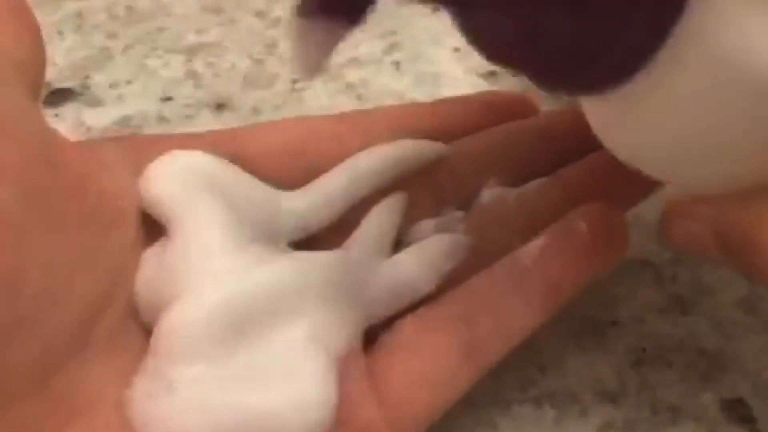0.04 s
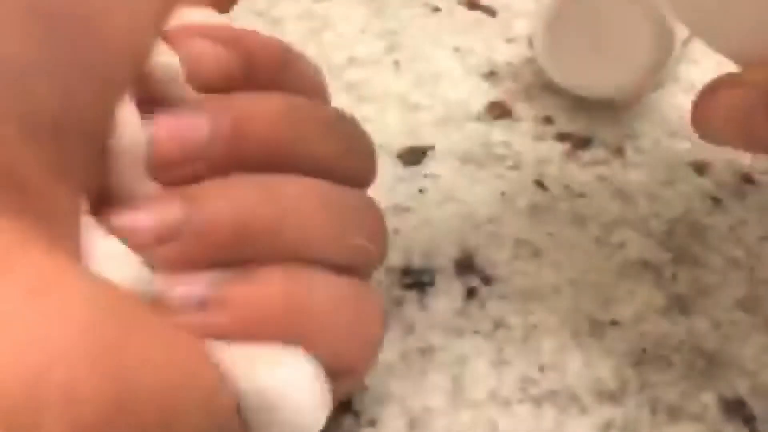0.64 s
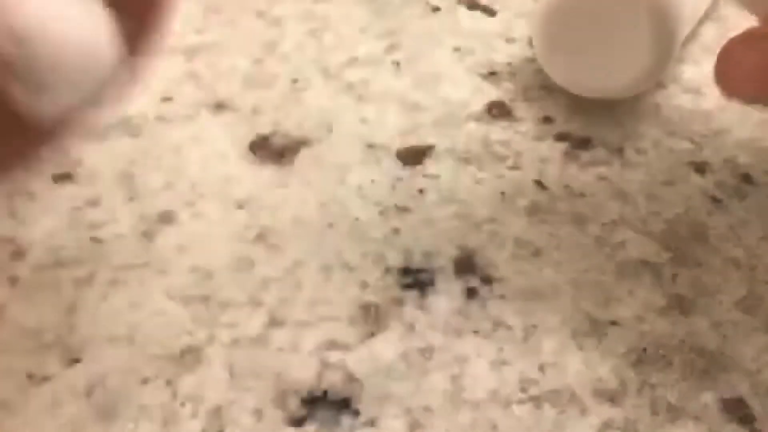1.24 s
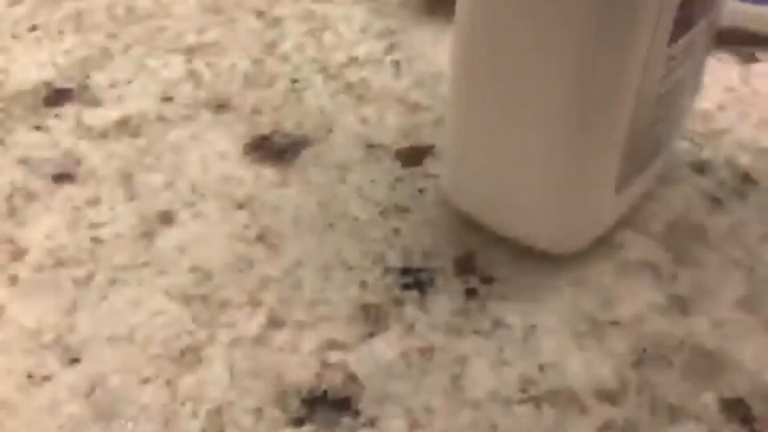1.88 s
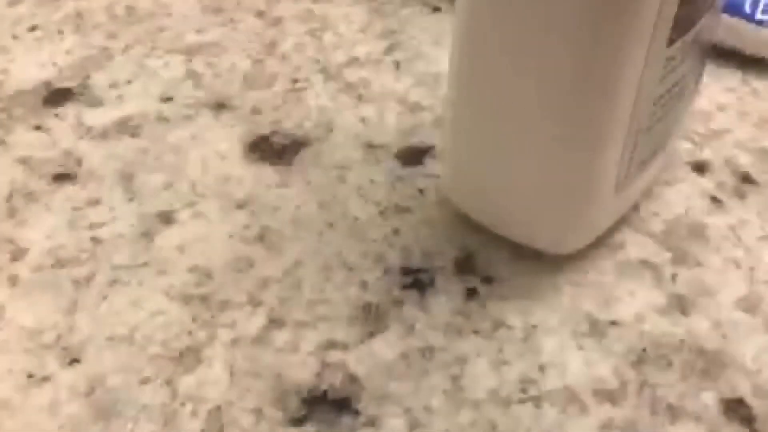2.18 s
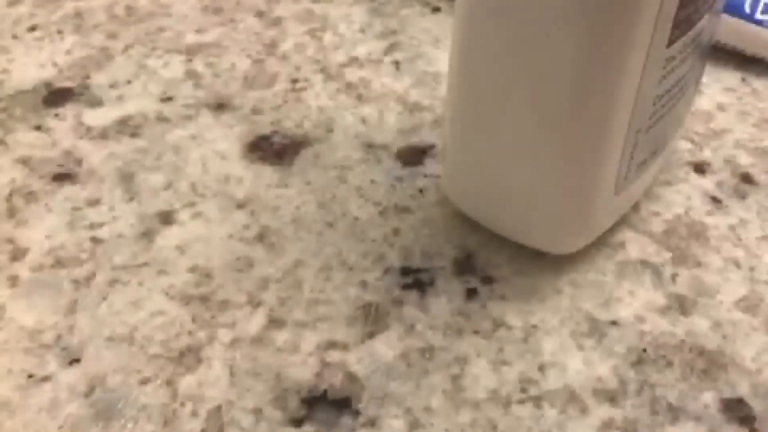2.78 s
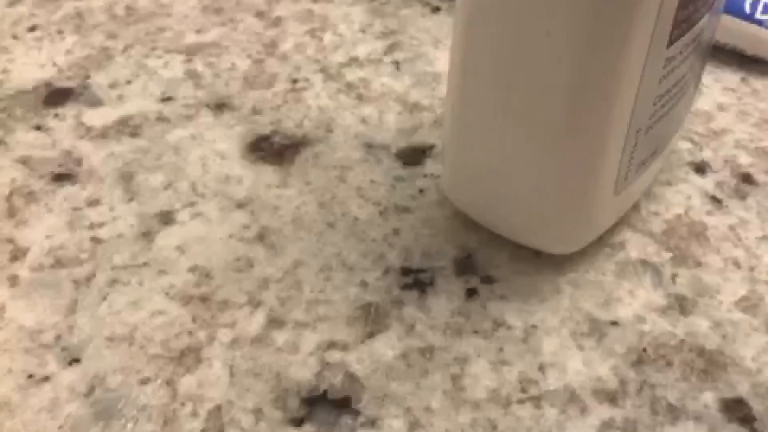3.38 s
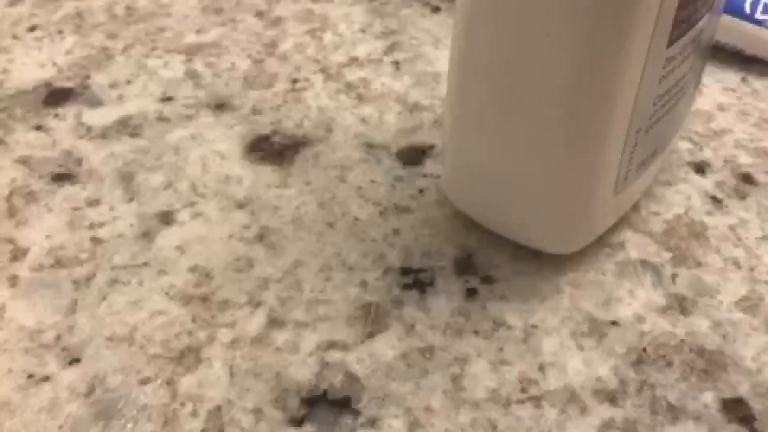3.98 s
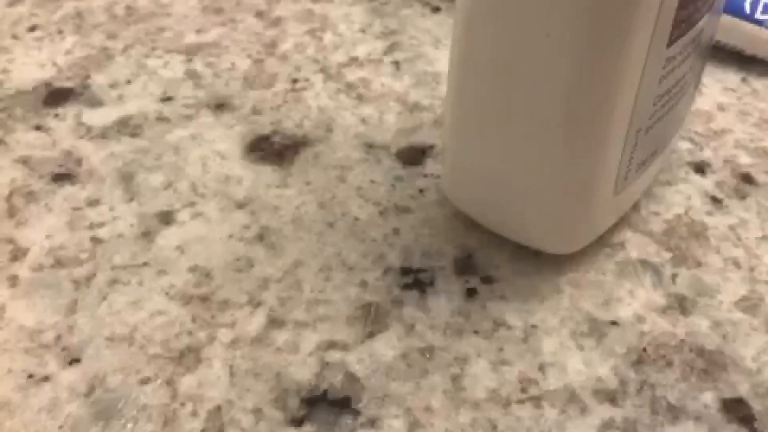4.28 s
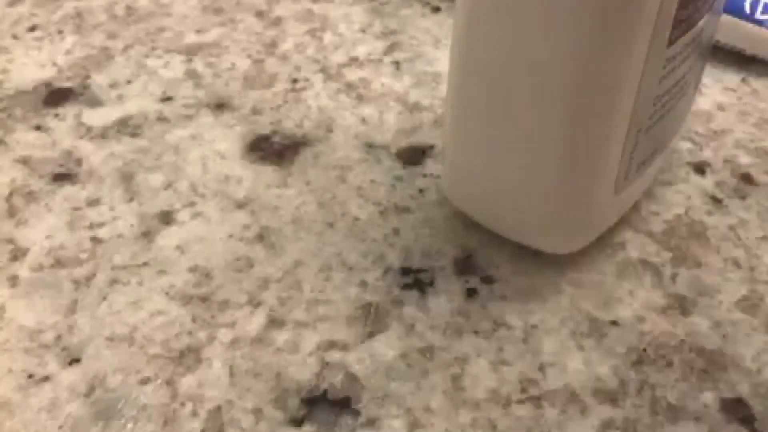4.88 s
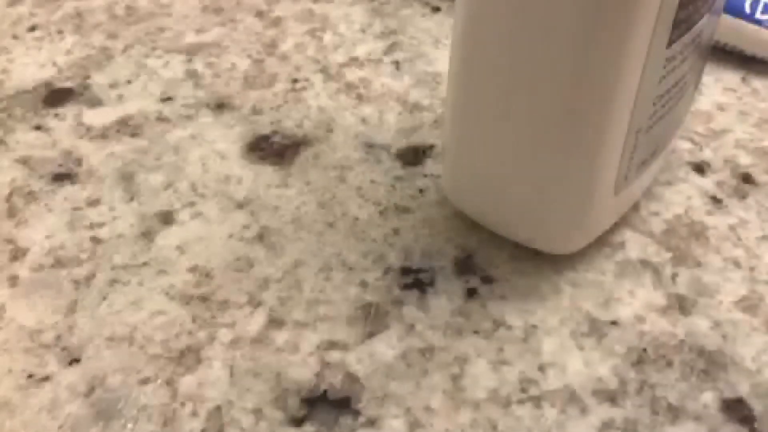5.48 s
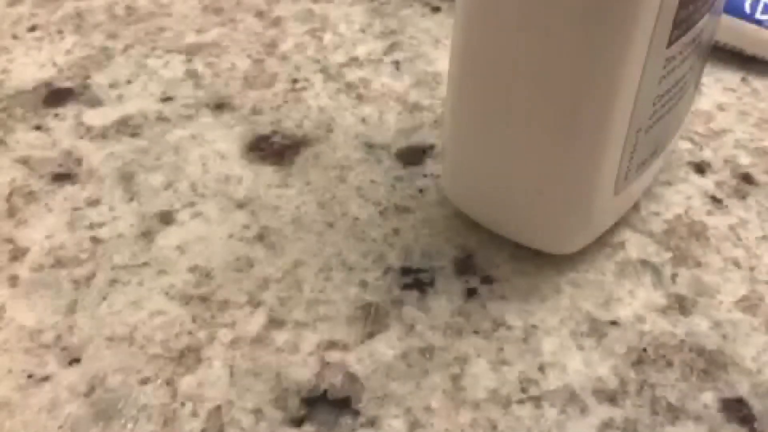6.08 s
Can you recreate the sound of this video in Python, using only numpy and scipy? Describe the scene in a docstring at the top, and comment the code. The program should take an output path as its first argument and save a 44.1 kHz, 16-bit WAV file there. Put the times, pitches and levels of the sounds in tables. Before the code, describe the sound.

Close up, hands rub and bump a hollow plastic bottle while its pump pushes out foam in four soft, fizzy spurts. A short wet squelch follows the first; after each of the others the pump draws in air and clicks back. A faint hum comes and goes, then the bottle lands on a stone counter with a hollow knock, ringing briefly in a small bathroom.

```python
"""In a small, hard-walled bathroom a soap pump is pressed, fizzing through its foam mesh, and a fist
squeezes the wet foam. Three more presses follow; after each, the spring sucks in air and the piston
clicks against its stop. Hands rustle and bump throughout, and the sound drops out briefly after the
second and fourth presses. Then a faint hum comes and goes, and at the end the bottle is set down on
the stone counter with a hollow knock."""
import sys
import numpy as np
from scipy import signal
from scipy.fft import rfft, irfft, next_fast_len
from scipy.io import wavfile
from scipy.ndimage import uniform_filter1d

SR = 44100
rng = np.random.default_rng(int(sys.argv[2]) if len(sys.argv) > 2 else 0)


def to_wav(sig):
    """Store sig (one row per channel, or 1-D mono) as 16-bit WAV at the path in sys.argv[1].

    Samples outside -1..1 are clipped; the rate is SR.
    """
    pcm = np.clip(np.atleast_2d(sig), -1, 1) * 32767
    pcm = np.round(pcm).astype(np.int16)
    wavfile.write(sys.argv[1], SR, pcm.T)  # frames by channels


N = 270753
TIME = np.arange(N) / SR


def amp(db):
    """Turn decibels into a gain. Table levels are relative: later gains and filters shift them."""
    return 10 ** (np.asarray(db) / 20)


def rms_one(x):
    """Scale a signal so that its average strength (rms) is 1."""
    return x / np.sqrt(np.mean(x ** 2) + 1e-20)


def at_hz(points, hz, column=1):
    """Read between the rows of a table, on a logarithmic frequency scale."""
    points = np.array(points)
    return np.interp(np.log(np.maximum(hz, 1)), np.log(points[:, 0]), points[:, column])


def cut(x, hz, kind, order=2):
    """Filter a sound, keeping its "low" part, its "high" part or a "band"."""
    sections = signal.butter(order, np.clip(hz, 10, .45 * SR), kind, fs=SR, output="sos")
    return signal.sosfilt(sections, x)


def coloured(x, spectrum):
    """Give a steady signal a tone colour; rms 1."""
    size = next_fast_len(len(x))
    gains = amp(at_hz(spectrum, np.fft.rfftfreq(size, 1 / SR)))
    return rms_one(irfft(rfft(x, size) * gains, size)[:len(x)])


def resonances(x, peaks):
    """Make a signal ring at several pitches, added with alternating signs; rms 1."""
    out = 0
    for k, (hz, width, db) in enumerate(peaks):
        r = np.exp(-np.pi * width / SR)
        ringing = signal.lfilter([1, 0, -1], [1, -2 * r * np.cos(2 * np.pi * hz / SR), r * r], x)
        out = out + (-1) ** k * amp(db) * (1 - r * r) * ringing
    return rms_one(out)


def decay(t, t60):
    """A fade that falls by 60 dB in the ring time t60."""
    return np.exp(-np.log(1000) * t / t60)


def ring(hz, t60):
    """Half a second of one struck tone."""
    t = TIME[:SR // 2]
    return np.sin(2 * np.pi * hz * t) * decay(t, t60)


def add(track, s, sound):
    """Mix a sound into a track, s seconds in."""
    at = max(round(s * SR), 0)
    track[at:at + len(sound)] += sound[:N - at]


def stroke(start, end, db, attack_s, release_s, swell_db=0):
    """Gain of one gesture: it fades in, changes by swell_db to reach db at its end, then dies away."""
    progress = np.clip((TIME - start) / (end - start), 0, 1)
    fade_in = np.clip((TIME - start) / attack_s, 0, 1)
    fade_out = np.exp(-np.clip((TIME - end) / release_s, 0, 20))
    return amp(db + swell_db * (progress - 1)) * fade_in * fade_out


def sputter(depth_db, rate_hz):
    """Quick random spurts of a wet flow or a sticky slide, as a gain."""
    return amp(depth_db * rms_one(cut(rng.standard_normal(N), rate_hz, "low")))


def grains(per_s, spread_db, air):
    """Random tiny bursts of uneven size over smooth air noise."""
    sizes = amp(spread_db * np.minimum(rng.exponential(1, N), 4)) * rng.choice([-1, 1], N)
    bursts = sizes * (rng.random(N) < per_s / SR)
    return rms_one(bursts) + air * rng.standard_normal(N)


def bubble(hz, cycles, rise=0.135):
    """A small air pocket rings and rises in pitch as it dies."""
    age = np.arange(int(cycles / hz * SR) + 2) * hz / SR / cycles  # runs from 0 to 1
    tone = np.sin(2 * np.pi * cycles * age * (1 + rise * age))
    return tone * decay(age, 1) * np.minimum(age / 0.033, 1)


def swarm(low_hz, high_hz, cycles, spread_db, count):
    """Bubbles of mixed pitch and size at random moments; rms 1."""
    out = np.zeros(N)
    for when, pitch, size in rng.random((count, 3)):
        hz = low_hz * (high_hz / low_hz) ** pitch
        add(out, when * N / SR, amp(spread_db * size ** 2) * bubble(hz, cycles))
    return rms_one(out)


# The tone colour of the still room. Each row: frequency in Hz, level in dB.
ROOM_COLOUR = [(18, -50), (30, -12), (93, 1.5), (245, -5), (345, 0.5), (473, -9.5), (666, -3), (844, -15),
               (1320, -20.5), (1910, -18.5), (4190, -23), (9220, -31), (14000, -38), (16000, -42.5)]
def still_room(db=-68.5):
    """A soft, low, steady noise lies behind everything."""
    return amp(db) * coloured(rng.standard_normal(N), ROOM_COLOUR)


def faint_hum(hz=366, width_hz=4):
    """A wavering hum in the room, made of a narrow band of noise, comes and goes."""
    swell = stroke(start=4.17, end=4.8, db=-73, attack_s=0.33, release_s=0.33)
    return swell * resonances(rng.standard_normal(N), [(hz, width_hz, 0)])


# The echo of the walls. Each row: frequency in Hz, ring time in seconds, level in dB.
WALL_ECHO = [(97.7, 0.37, -11), (261, 0.65, -7.5), (590, 0.22, -6), (1250, 0.39, -5.5), (4000, 0.17, -9),
             (7950, 0.16, -12), (15000, 0.11, -14.5)]
def bathroom(x, first_echo_s=.004, build_s=0.0031):
    """Close walls throw back a dense echo that dies faster in the treble."""
    t, tail = TIME[:SR * 3 // 4], 0
    edges_hz = np.geomspace(50, 18000, 15)
    white = rng.standard_normal((2, len(t)))
    build_up = np.clip((t - first_echo_s) / build_s, 0, 1)
    for k, band in enumerate(zip(edges_hz, edges_hz[1:])):
        hz = np.sqrt(band[0] * band[1])
        fade = decay(t, at_hz(WALL_ECHO, hz)) * build_up
        gain = amp(at_hz(WALL_ECHO, hz, column=2)) / np.linalg.norm(fade)
        tail = tail + gain * cut(white[k % 2], band, "band") * fade
    return signal.fftconvolve(x, tail)[:N]


# Echoes from the bottle, palm and counter. Each row: delay in seconds, level in dB.
CLOSE_ECHOES = [(.00093, -18), (.00152, -29.5), (.00242, -21.5), (.0056, -29)]
def near_surfaces(x):
    """Very quick echoes colour the sound above the bottle's lowest ring."""
    out, bright = x.copy(), cut(x, 420, "high")
    for delay_s, db in CLOSE_ECHOES:
        add(out, delay_s, amp(db) * bright)
    return out


# Tone colours of skin on plastic, the bottle's hollow murmur and the dull rumble of handling.
# Each row: frequency in Hz, level in dB.
SKIN_COLOUR = [(530, -15.5), (900, 1), (1310, -9), (1720, -7), (4680, 0), (5350, -4.5), (6330, 0),
               (15100, -5), (16000, -28)]
MURMUR_COLOUR = [(300, -28), (450, 1.5), (550, 3.5), (700, 5), (850, -12), (1200, -16), (2000, -18.5),
                 (4000, -23), (7000, -37.5)]
RUMBLE_COLOUR = [(25, -33.5), (55, -26), (130, 5), (220, -3.5), (340, -1.5), (450, -10), (800, -42)]
# Hand movements. Each row: start and end in seconds, then rub, murmur and rumble levels in dB.
HAND_MOVES = [(0.251, 0.413, -68, -60, -58.5), (0.595, 0.848, -87, -57, -65.5),
              (0.98, 1.345, -95, -66.5, -59.5), (1.6, 1.73, -93, -62.5, -63.5),
              (2.76, 3.107, -101, -70.5, -67), (3.156, 3.406, -107, -75, -67.5),
              (4.416, 4.491, -70, -65, -61.5), (4.516, 4.715, -68, -75, -71), (4.775, 5.247, -80, -86, -87),
              (5.319, 5.364, -74.5, -71.5, -92), (5.537, 5.665, -73, -55, -59.5)]
def hands():
    """Skin rustles on the plastic; the held bottle murmurs and rumbles with every movement and press."""
    sliding = flexing = shifting = 0
    for start, end, rub_db, murmur_db, rumble_db in HAND_MOVES:
        move = stroke(start, end, db=0, attack_s=.035, release_s=0.043, swell_db=4.5)
        sliding += amp(rub_db) * move
        flexing += amp(murmur_db) * move
        shifting += amp(rumble_db) * move
    pushing = sum(press(start, end, db) for start, end, _, db in PUMP_PRESSES)
    skin = coloured(grains(per_s=690, spread_db=11, air=1.9), SKIN_COLOUR)
    rub = skin * sliding * sputter(depth_db=2, rate_hz=45)
    murmur = coloured(grains(per_s=340, spread_db=2.5, air=0.91), MURMUR_COLOUR) * (flexing + pushing)
    rumble = coloured(rng.standard_normal(N), RUMBLE_COLOUR) * (shifting + amp(-6) * pushing)
    return amp(-0.5) * rub + amp(-3.5) * murmur + amp(-2) * rumble


# Hands and bottle bump. Each row: start in seconds, level in dB, pitch in Hz, ring time in seconds.
SOFT_BUMPS = [(0.1447, -29.5, 395, 0.021), (.373, -39, 235, 0.025), (0.4, -38.5, 118, 0.033),
              (0.652, -46, 180, 0.06), (.974, -22, 268, 0.02), (.979, -31, 151, 0.079),
              (4.418, -49.5, 126, 0.068), (4.493, -54.5, 197, 0.045), (5.731, -27, 250.3, 0.34),
              (5.877, -37, 166, 0.25)]
def bumps():
    """A padded touch rings briefly at one low pitch; a filter rounds off its start."""
    out = np.zeros(N)
    for s, db, hz, t60 in SOFT_BUMPS:
        add(out, s, amp(db) * cut(ring(hz, t60), [0.55 * hz, 5.6 * hz], "band"))
    return out


# The tones of the counter with its cabinet, and of the bottle's hard rim.
# Each row: pitch in Hz, level in dB, ring time in seconds.
COUNTER_TONES = [(127, -35, 0.46), (155, -38.5, .3), (206, -33.5, 0.26), (258.5, -19.5, 0.088),
                 (350, -28.5, 0.067), (371, -34, 0.13), (421, -45, 0.74), (533, -23.5, 0.14),
                 (561, -20.5, 0.046), (645, -22, 0.096), (662, -49, 0.15)]
RIM_TONES = [(1200, -35, 0.039), (1575, -43.5, 0.069), (1830, -36, 0.019), (2410, -35.5, 0.016),
             (2860, -34, 0.017), (3440, -32.5, 0.011), (4000, -31.5, 0.012), (5000, -47, 0.012),
             (6610, -56, 0.016), (8750, -50, 0.025)]
# The bottle lands and settles. Each row: start in seconds, level in dB, treble cut-off in Hz.
COUNTER_TOUCHES = [(5.639, -31, 910), (5.680, -35.5, 1110), (5.7296, -26, 1000), (5.7467, -4.5, 900),
                   (5.7497, 0.5, 900), (5.7567, -16.5, 800), (5.804, -30, 400), (5.869, -26, 905),
                   (5.966, -32, 900)]
def bottle_set_down(landing_s=5.7452):
    """Each touch rings the counter with its own strength and dullness; the rim cracks as it lands."""
    out = np.zeros(N)
    counter = sum(amp(db) * ring(hz, t60) for hz, db, t60 in COUNTER_TONES)
    for s, db, contact_hz in COUNTER_TOUCHES:
        add(out, s, amp(db) * cut(counter, contact_hz, "low", order=4))
    rim = sum((-1) ** k * amp(db) * ring(hz, t60) for k, (hz, db, t60) in enumerate(RIM_TONES))
    add(out, landing_s, rim)
    return cut(out, 186, "high")


# The tones of the hollow bottle. Each row: pitch in Hz, level in dB, ring time in seconds.
BOTTLE_TONES = [(370, -6, 0.078), (585, 10, 0.031), (701, 4, 0.085), (1088, -4.5, 0.048)]
# Where the pump's plastic parts ring. Each row: pitch in Hz, width in Hz, level in dB.
PLASTIC_PEAKS = [(1130, 150, 1), (1890, 78, 6), (2500, 630, -2.5), (3840, 590, 2.5), (4400, 560, 3),
                 (4800, 180, 4.5), (5540, 230, -1.5), (6710, 410, -2.5), (10330, 1200, -7.5),
                 (11100, 1500, -6.5), (13900, 4100, -12)]
# Stray clicks of pump and bottle. Each row: start in seconds, snap level in dB,
# treble compared with the snap in dB, bottle ring in dB.
STRAY_CLICKS = [(.0182, -42, -8.5, -45.5), (.028, -61, -7, -42), (.9725, -53.5, -38, -45.5),
                (1.0685, -68, -10, -56.5), (1.211, -63, -15, -64.5), (1.259, -58, -5, -62),
                (1.331, -64.5, -17, -62), (1.4019, -43, -7.5, -52), (1.588, -57, -12, -69),
                (1.635, -54, -4, -55.5), (2.348, -60, -26, -54), (2.416, -54, -11, -51),
                (2.783, -65, -3, -77), (2.838, -67.5, 9.5, -61.5), (3.3795, -47, -10, -47.5),
                (5.511, -55.5, -3, -61), (5.745, -32.5, -10, -49), (5.8687, -59, -10, -58),
                (5.918, -63.5, -16, -60)]
def plastic_clicks(rise_s=.0007, split_hz=7500, lead_s=.0016):
    """The bottle wall gives way, then the plastic parts snap together and buzz; the treble dies first."""
    out, t = np.zeros(N), TIME[:SR // 16]
    for s, snap_db, treble_db, ring_db in STRAY_CLICKS + return_clicks():
        buzz = resonances(rng.standard_normal(len(t)), PLASTIC_PEAKS)[::-1] * np.minimum(t / rise_s, 1)
        snap = cut(buzz, split_hz, "low", order=4) * decay(t, t60=0.024)
        tick = cut(buzz, split_hz, "high", order=4) * decay(t, t60=0.0095)
        bottle = sum(amp(db + rng.normal(0, 1)) * ring(hz, t60) for hz, db, t60 in BOTTLE_TONES)
        add(out, s, amp(snap_db - 1) * (snap + amp(treble_db + 10) * tick))
        add(out, s - lead_s, amp(ring_db - 4) * cut(bottle, [160, 1600], "band"))
    return out


# Wet gurgles in the pump and the fist.
# Each row: start in seconds, level in dB, pitch in Hz, length in seconds.
WET_GURGLES = [(0.069, -57, 4400, 0.065), (1.065, -49, 3320, .027), (1.065, -58, 4450, 0.022),
               (1.194, -54.5, 1410, 0.0058), (1.197, -58, 4800, .014), (1.358, -56.5, 2450, 0.032),
               (1.392, -51, 5200, 0.022), (2.360, -57.5, 4200, 0.0064)]
def gurgles(scatter=0.1, count=6, gulp_s=.012, gulp_hz=(1380, 5430)):
    """Quick runs of bubbles of about one size; the wet valve also gulps as air breaks through it."""
    out = np.zeros(N)
    gulps = [(opens, tick_db - 3.5, hz, gulp_s)
             for opens, _, _, tick_db, *_ in SPRING_RETURNS for hz in gulp_hz]
    for s, db, hz, length in WET_GURGLES + gulps:
        for k in range(count):
            bubble_hz = hz * np.exp(scatter * rng.uniform(-2.1, 1.1))
            add(out, s + length * k / count, amp(db) * bubble(bubble_hz, cycles=40))
    return out


# Where the air inlet rings. Each row: pitch in Hz, width in Hz, level in dB.
INLET_PEAKS = [(593, 190, 18), (1190, 73, -15), (3370, 1700, -30.5), (5300, 220, 8), (6470, 730, 6.5),
               (8100, 120, -12), (7960, 730, -2.5), (9380, 580, 8), (11500, 4300, -8), (13100, 680, 3)]
# The spring lifts the piston. Each row: when the valve opens and when the piston stops in seconds,
# then the levels of air, valve tick, stop click and bottle ring in dB.
SPRING_RETURNS = [(2.0347, 2.151, -68.5, -51, -40, -44), (3.037, 3.148, -71, -56.5, -42, -42.5),
                  (4.133, 4.2619, -71.5, -56, -41.5, -47.5)]
def air_intake():
    """The rising piston draws crackling air through the wet inlet; the flow sags as the spring relaxes."""
    flow = sum(stroke(opens, stops, db, attack_s=.003, release_s=0.01, swell_db=-7)
               for opens, stops, db, *_ in SPRING_RETURNS)
    air = resonances(grains(per_s=1200, spread_db=4.5, air=.7), INLET_PEAKS)
    wet = swarm(low_hz=2500, high_hz=14000, cycles=80, spread_db=18, count=3500)
    return flow * (amp(2.5) * air + amp(-8.5) * wet)


def return_clicks(rebound_s=.005, rebound_db=-10):
    """The valve ticks, then the piston hits its stop and bounces once; rows as in STRAY_CLICKS."""
    rows = []
    for opens, stops, _, tick_db, stop_db, ring_db in SPRING_RETURNS:
        rows.append((opens, tick_db, 2.5, tick_db - 8))
        rows.append((stops, stop_db, 0.5, ring_db))
        rows.append((stops + rebound_s, stop_db + rebound_db, 0.5, ring_db + rebound_db))
    return rows


# The tone colour of crushed foam. Each row: frequency in Hz, level in dB.
CRUSHED_COLOUR = [(700, -4.5), (1500, -8), (2300, -15), (3200, -7), (4600, -9), (6500, -15), (12000, -14.5),
                  (16000, -19)]
def foam_squeeze():
    """The fist closes once on the wet foam, crushing bubbles; the squelch then dies away."""
    squeeze = stroke(start=1.06, end=1.082, db=-60, attack_s=0.009, release_s=0.057)
    crackle = coloured(grains(per_s=410, spread_db=3.5, air=1.0), CRUSHED_COLOUR)
    pops = swarm(low_hz=2700, high_hz=5200, cycles=45, spread_db=12, count=3000)
    return squeeze * (amp(2) * crackle + amp(-0.5) * pops)


def press(start, end, db):
    """Gain of one push on the pump: the flow grows as the piston goes down."""
    return stroke(start, end, db, attack_s=0.01, release_s=0.0247, swell_db=2.5)


# Where the foam mesh and nozzle ring. Each row: pitch in Hz, width in Hz, level in dB.
NOZZLE_PEAKS = [(520, 64, 22), (710, 193, 13.5), (1015, 83, 15), (1640, 110, 6), (2460, 1600, -28.5),
                (3820, 171, 0.5), (5000, 290, 3), (5430, 121, -2.5), (6350, 450, 3), (9320, 510, -1),
                (12440, 2400, -10.5)]
# Presses of the pump. Each row: start and end in seconds, fizz in dB, bottle murmur in dB.
PUMP_PRESSES = [(0.0, 0.213, -79, -52.5), (1.366, 1.574, -64, -54), (2.423, 2.705, -72.5, -58),
                (3.444, 3.673, -70.5, -62.5)]
def foam_fizz():
    """Each press pushes soap through the mesh in spurts, and bubbles are born there."""
    pushing = sum(press(start, end, db) for start, end, db, _ in PUMP_PRESSES)
    flow = pushing * sputter(depth_db=3, rate_hz=29)
    fizz = resonances(grains(per_s=1800, spread_db=6, air=0.59), NOZZLE_PEAKS)
    pops = swarm(low_hz=950, high_hz=10000, cycles=60, spread_db=18, count=4000)
    return flow * (amp(4.5) * fizz + amp(-5.5) * pops)


def scene():
    """Pump, hands and counter close by, with the room behind them."""
    pump = plastic_clicks() + foam_fizz() + foam_squeeze() + gurgles() + air_intake()
    close = amp(-0.5) * near_surfaces(pump) + hands()
    thuds = bumps() + bottle_set_down()
    background = still_room() + faint_hum()
    echo = bathroom(close + amp(-3) * thuds)
    return (close + thuds + echo + background)[None]


# The sound drops out. Each row: start and end in seconds.
SILENT_GAPS = [(1.768, 1.955), (3.878, 4.089)]
def record(dry, bass_hz=40, top_hz=16600):
    """The deep bass is turned down, the sound falls silent twice, and the highest treble is cut."""
    live = 1 - sum((TIME > start) & (TIME < end) for start, end in SILENT_GAPS)
    gate = uniform_filter1d(live.astype(float), size=64)  # softens the edges of the gaps
    gated = cut(dry, bass_hz, "high", order=3) * gate
    return signal.sosfilt(signal.cheby2(14, 70, top_hz, fs=SR, output="sos"), gated)


dry = scene()
out = record(dry)
to_wav(out)
```